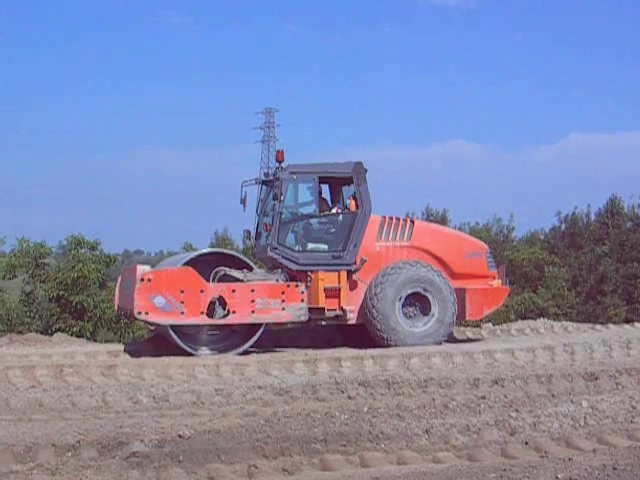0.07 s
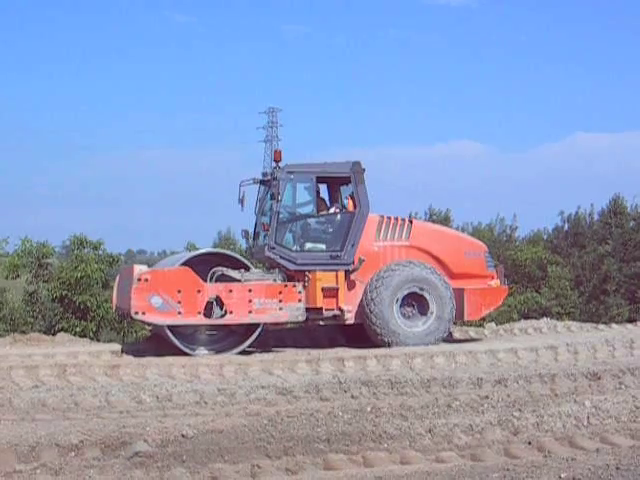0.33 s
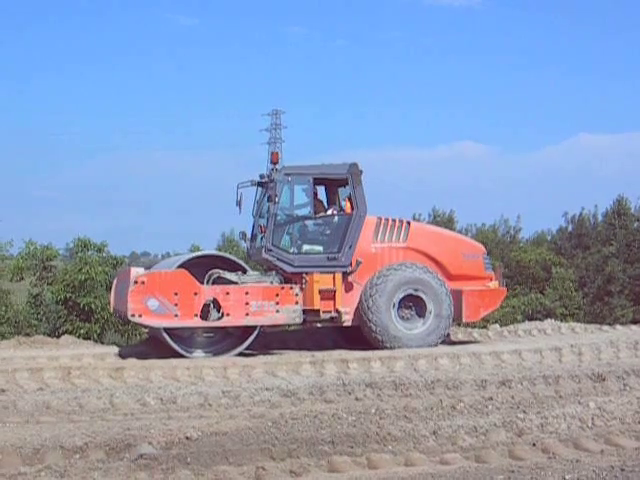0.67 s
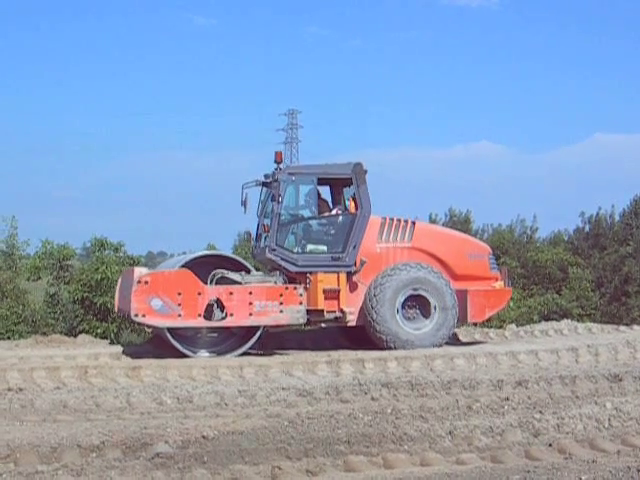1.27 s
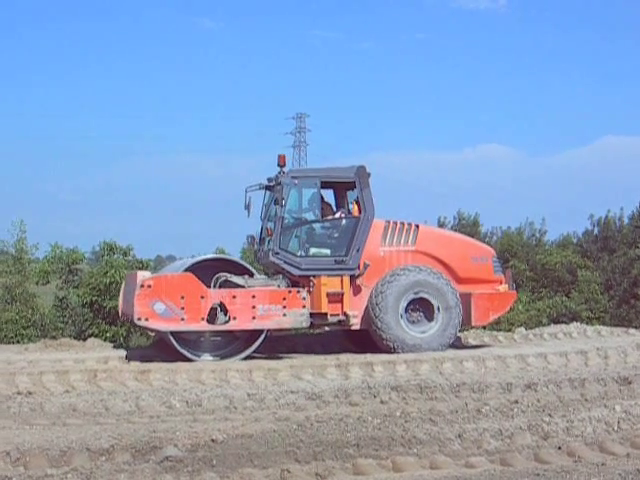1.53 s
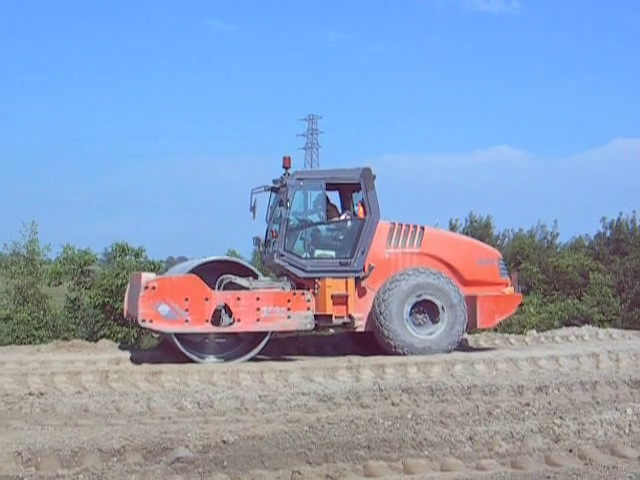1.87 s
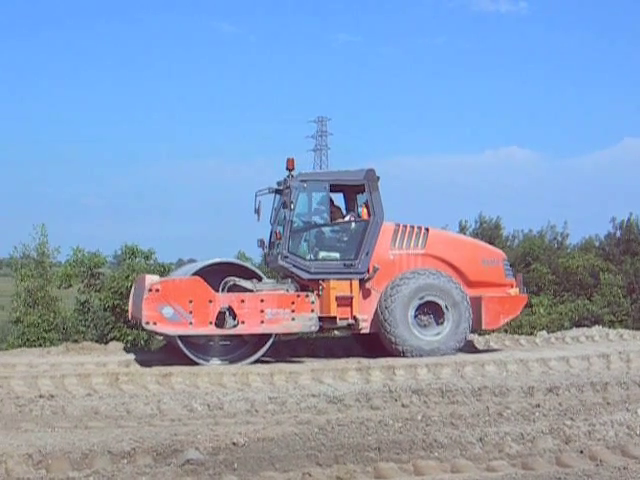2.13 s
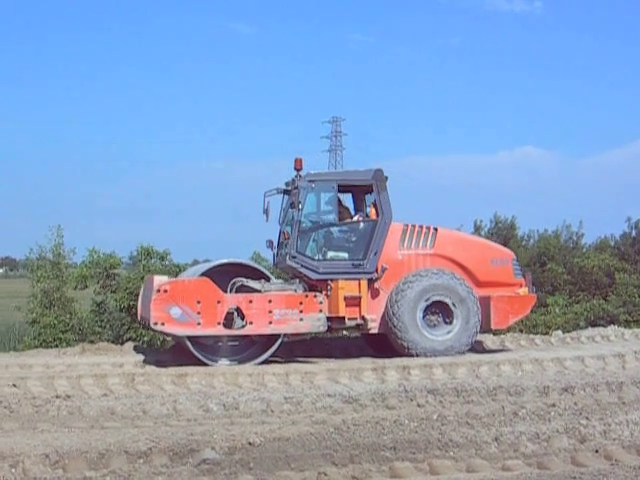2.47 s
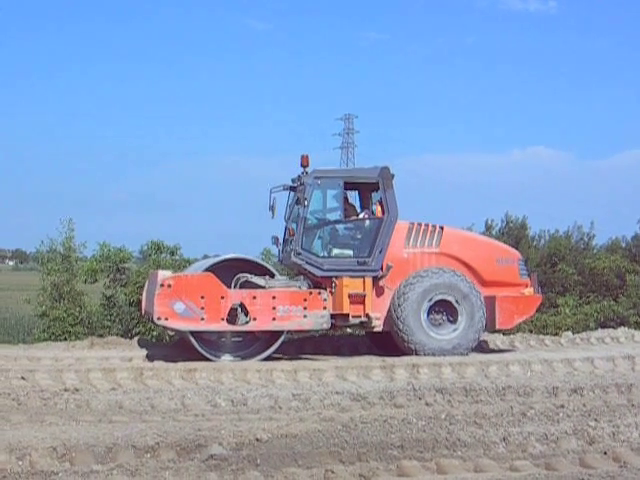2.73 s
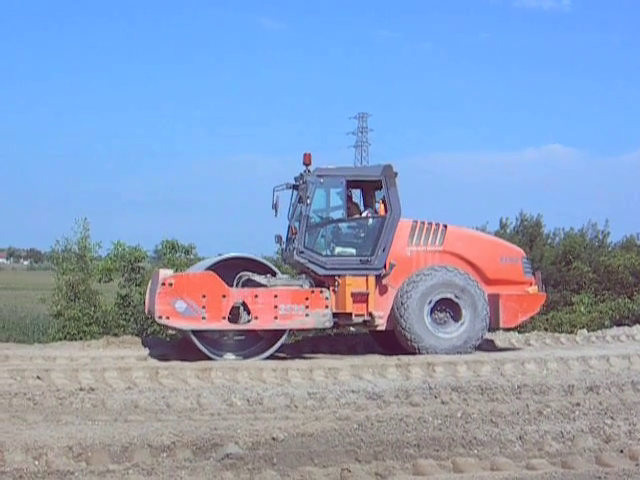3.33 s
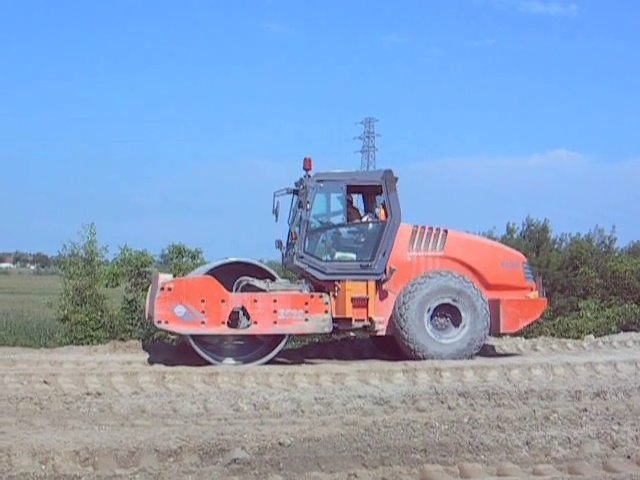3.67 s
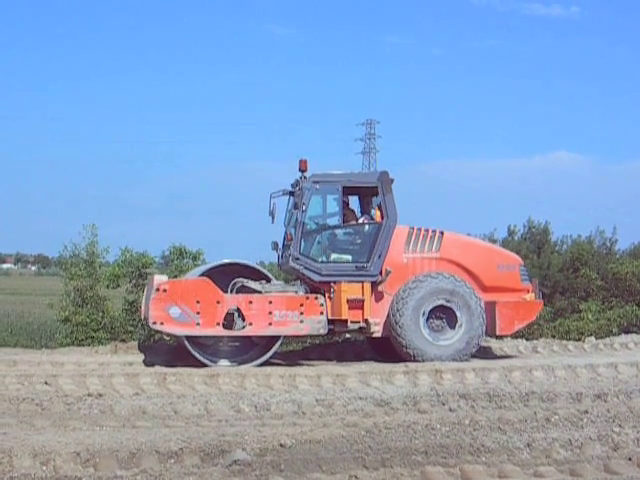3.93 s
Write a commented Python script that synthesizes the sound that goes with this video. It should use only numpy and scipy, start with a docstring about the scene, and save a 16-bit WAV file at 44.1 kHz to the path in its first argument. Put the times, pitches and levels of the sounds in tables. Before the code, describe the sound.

Steady low diesel drone of a heavy road roller, its frame vibrating and faintly clanking.

```python
"""A low diesel drone, with a booming frame over it: a heavy soil roller creeps over bare, open ground.
The governed four-cylinder engine fires twice per turn, sounding exhaust harmonics and knocking its
block, and drives a humming hydraulic pump. The vibrating drum forces the frame into oscillation:
panels boom and fittings rattle twice per turn. A loose plate clanks; once the frame briefly groans."""
import sys
import numpy as np
from scipy import signal
from scipy.fft import rfft, irfft
from scipy.io import wavfile
from scipy.ndimage import uniform_filter1d, minimum_filter1d

SR = 44100
rng = np.random.default_rng(int(sys.argv[2]) if len(sys.argv) > 2 else 0)


def persist_wave(psi):
    """Save psi, clipped to +-1, as 16-bit WAV."""
    counts = np.round(np.clip(psi, -1, 1) * 32767).astype(np.int16)
    wavfile.write(sys.argv[1], SR, np.atleast_2d(counts).T)


N = 176400
T = np.arange(N) / SR
CRANK_HZ, DRUM_HZ, PUMP_HZ = 47.72, 27.31, 453.6
WAVER, HUM_WAVER = .51, .08   # depth of random modulation: unsteady tones, steadier hums


def from_db(db):
    """Amplitude ratio: tenfold for every 20 dB."""
    return 10 ** (np.asarray(db) / 20)


def rms_one(x):
    """Normalisation to unit rms."""
    return x / np.sqrt(np.mean(x ** 2) + 1e-20)


def level(rows):
    """Amplitude envelope, interpolated between (t/s, level/dB) rows."""
    return from_db(np.interp(T, *np.transpose(rows)))


def drift(rate_hz):
    """Low-passed noise: a slow random fluctuation of spread 1."""
    pole = np.exp(-80 * np.pi * rate_hz / SR)   # one step per 40 samples
    noise = rng.standard_normal(N // 40 + 2002)
    slow = signal.lfilter([1], [1, -2 * pole, pole * pole], noise)[2000:]
    return np.interp(np.arange(N) / 40, np.arange(len(slow)), rms_one(slow))


def colour(x, spectrum):
    """Spectral shaping by (f/Hz, level/dB) rows; unit rms."""
    hz, db = np.transpose(spectrum)
    bins = np.maximum(np.arange(N // 2 + 1) * SR / N, 1)
    response = from_db(np.interp(np.log(bins), np.log(hz), db))
    return rms_one(irfft(rfft(x) * response, N))


def band(x, edges, kind="band", order=2):
    """Maximally flat filtering; unit rms."""
    return rms_one(signal.sosfilt(signal.butter(order, edges, kind, fs=SR, output="sos"), x))


def shaft(hz, wander=.0009):
    """Phase in turns: the integral of a governed, slightly wandering speed."""
    return np.cumsum(hz * (1 + wander * drift(1.5))) / SR


def tone(turns, waver, rate_hz=2.2):
    """A sinusoid under random amplitude and phase modulation; unit rms."""
    phasor = (1 + waver * (drift(rate_hz) + 1j * drift(rate_hz))) * np.exp(2j * np.pi * rng.random())
    return rms_one(np.real(phasor * np.exp(2j * np.pi * turns)))


def harmonics(turns, hz, rows, full_waver_hz=347):
    """Periodic motion sounds at multiples of its rate; the low ones are the steadiest."""
    return sum(from_db(db) * tone(round(k) * turns, WAVER * min(k * hz / full_waver_hz, 1))
               for k, db in rows)


def blows(turns, spread):
    """An impulse train: one blow per turn, of random strength."""
    new_turn = np.diff(np.floor(turns), prepend=np.floor(turns[0])) > 0
    return new_turn * (1 + spread * rng.uniform(-1.5, 1, N))


def roar():
    """Exhaust and soil radiate low-frequency noise with a continuous spectrum."""
    # spectrum of the roar: f/Hz, relative level/dB
    spectrum = [(20, -31), (42, -28), (55, -17.5), (70, -12.5), (86, -1), (112, 2), (150, -1), (172, -6.5),
                (200, 2), (228, 3), (265, -8), (305, -0.5), (340, 3), (385, -9), (450, -4.5), (700, -57)]
    return from_db(-23.5) * colour(rng.standard_normal(N), spectrum)


def panels(drum, modes, swell_db=.5, shake_depth=.21, top_hz=1860):
    """Noise-driven resonances of sheet metal, each swelling on its own, modulated at the drum's rate."""
    out = 0
    for hz, width_hz, db in modes:
        ringing = band(rng.standard_normal(N), [hz - width_hz / 2, hz + width_hz / 2], order=1)
        out = out + from_db(db) * rms_one(ringing * from_db(swell_db * drift(2.5)))
    out = signal.sosfilt(signal.butter(3, top_hz, fs=SR, output="sos"), out)
    return out * (1 + shake_depth * np.cos(2 * np.pi * drum))


def bodywork(drum):
    """Resonance: the shaken hood growls in its low modes, the frame's panels roar in higher ones."""
    # modes of hood and panels: f/Hz, bandwidth/Hz, relative level/dB
    hood_modes = [(464, 73, -6), (555, 42, -9), (635, 26, -9)]
    panel_modes = [(745, 43, -12), (852, 70, -12), (971, 48, -13.5), (1081, 89, -16.5)]
    # their envelopes: t/s, level/dB
    hood_level = [(0, -8.5), (.12, -17), (.23, -14.5), (.33, -17), (.55, -14.5), (.9, -15), (1.1, -19),
                  (1.35, -20.5), (1.58, -16.5), (1.8, -15.5), (2.05, -21), (2.17, -17), (2.33, -15),
                  (2.45, -20), (2.8, -15.5), (3.05, -16.5), (3.27, -12), (3.42, -20), (3.55, -14.5),
                  (4, -18.5)]
    panel_level = [(0, -17), (.25, -18.5), (.4, -18.5), (.5, -17), (.62, -20), (.72, -15.5), (1.05, -16.5),
                   (1.15, -21.5), (1.4, -19), (1.6, -20), (1.78, -16.5), (2.0, -17), (2.3, -16), (2.5, -17),
                   (2.8, -17.5), (3.0, -15.5), (3.3, -17.5), (3.43, -22.5), (3.55, -12.5), (3.7, -17.5),
                   (4, -13.5)]
    return level(hood_level) * panels(drum, hood_modes) + level(panel_level) * panels(drum, panel_modes)


def hydraulic_drive():
    """Pressure pulsation makes the pump hum; the drive whines, out of step with crank and drum."""
    # envelope of the hum: t/s, relative level/dB
    hum_level = [(0, -29), (.3, -30), (.48, -29), (.6, -26), (.88, -33.5), (1.05, -30), (1.18, -25),
                 (1.35, -23.5), (1.47, -36), (1.65, -28.5), (1.88, -25.5), (2.1, -39), (2.3, -29.5),
                 (2.6, -25), (2.75, -33.5), (3.05, -25.5), (3.25, -29), (3.42, -37.5), (3.6, -28), (4, -31)]
    # whines of the drive: f/Hz, level/dB
    whines = [(533.7, -30), (664.5, -33), (923, -37.5)]
    hum = from_db(3) * level(hum_level) * tone(shaft(PUMP_HZ), HUM_WAVER)
    return hum + sum(from_db(db) * tone(shaft(hz), WAVER) for hz, db in whines)


def groan(start_s=2.44, length_s=.27, hz=311, sag_hz_per_s=36):
    """The frame groans once: a linear downward glide in frequency."""
    age = np.clip(T - start_s, 0, length_s)
    turns = hz * age - sag_hz_per_s * age ** 2 / 2
    arch = np.sqrt(np.abs(np.sin(np.pi * age / length_s)))
    return from_db(-17.5) * arch * np.sin(2 * np.pi * turns)


def contact(age, hz=700, decay_s=.00091, tick_s=.0004):
    """An impact transient: a heavily damped knock with a sharp tick on its front."""
    thud = np.exp(-age / decay_s) * np.sin(2 * np.pi * hz * age)
    tick = from_db(-12.5) * np.exp(-age / tick_s) * rng.standard_normal(len(age))
    return thud + tick


def loose_plate():
    """Free vibration: a steel plate strikes the frame and its modes decay exponentially."""
    # impacts: t/s, relative ring level/dB, knock level/dB
    impacts = [(.464, -10.5, -9), (.936, -16, -9), (1.04, -17, -8), (1.413, -9, 1.5), (1.76, -12, -18),
               (1.886, -13, -18), (1.93, -12, -10), (2.003, -16, -18), (2.21, -11.5, -18),
               (2.728, -10, -7.5), (3.154, -8, -7), (3.384, -7.5, -12), (3.544, -7, -16), (3.793, -11, -10)]
    # modes of the plate: f/Hz, relative level/dB, time to fall 60 dB/s
    modes = [(800, -2.5, 0.054), (931, -3, 0.11), (999.5, 1, 0.15), (1150, -11, 0.11), (1514, -21, .04)]
    out = np.zeros(N)
    for start_s, ring_db, knock_db in impacts:
        clank = out[int(start_s * SR):][:SR // 4]
        age = T[:len(clank)]
        clank += from_db(knock_db) * contact(age)
        for hz, mode_db, t60 in modes:
            onset_db = ring_db + mode_db - 7 + rng.normal(0, 1.2)
            envelope = from_db(onset_db - 60 * age / t60)
            clank += envelope * np.sin(2 * np.pi * hz * age) * rng.choice([-1, 1])
    return out


def rattle(drum, scatter_turns=.064, spread=.6, decay_s=.0056):
    """Impact noise: loose fittings chatter on the drum's downstroke and more softly on its backstroke."""
    loose = drum + scatter_turns * drift(15)
    hits = blows(loose, spread) + from_db(-3.5) * blows(loose + .5, spread)
    envelope = signal.lfilter([1], [1, -np.exp(-1 / (decay_s * SR))], hits + 1e-18)
    return rms_one(envelope * rng.standard_normal(N))


def knock(crank, cylinders=4, decay_s=.02):
    """Each cylinder fires every second turn and excites its own impulse response of the block."""
    rings = rng.standard_normal((cylinders, SR // 10)) * np.exp(-T[:SR // 10] / decay_s)
    return rms_one(sum(signal.fftconvolve(blows(crank / 2 + k / cylinders, spread=.23), ring)[:N]
                       for k, ring in enumerate(rings)))


def clatter(crank, drum, low_cut_hz=1200):
    """Source and filter: fan rush, knock and rattle are coloured by the block and its fittings."""
    # response of block and fittings: f/Hz, relative level/dB
    response = [(700, -0.5), (1150, 3.5), (1240, -1.5), (1330, 1), (1550, -1.5), (1800, -4), (2100, -2.5),
                (2550, -5), (2950, -6.5), (3430, -11), (3700, -15), (3920, -22), (4220, -23), (4500, -28),
                (4750, -38), (5000, -39.5)]
    # envelope of the clatter: t/s, relative level/dB
    clatter_level = [(.25, -22), (.5, -23.5), (.7, -24), (1.0, -22), (1.25, -24), (1.42, -23.5),
                     (1.55, -24.5), (1.7, -23), (2.2, -23), (2.45, -24), (2.9, -23.5), (3.15, -22.2),
                     (3.4, -23.5), (3.53, -22), (3.65, -23), (4, -22.5)]
    fan = rng.standard_normal(N)
    excitation = fan + from_db(-2.5) * knock(crank) + from_db(-5) * rattle(drum)
    return from_db(2.24) * level(clatter_level) * band(colour(excitation, response), low_cut_hz, "high")


def frame(drum):
    """Forced vibration: the frame sounds harmonics of the drum's rate; one panel booms at the eighth."""
    # tones of the frame: multiple of the drum rate, level/dB
    partials = [(1, -46.5), (2, -57), (4, -45), (5, -29.5), (6, -38.5), (7, -41.5), (9, -37), (15, -46),
                (16, -39), (17, -36.5), (18, -32), (19, -36), (20, -35.5), (22, -32), (23, -32.5),
                (24, -41), (25, -36), (27, -37), (28, -43.5), (29, -39.5), (30, -36.5), (35, -44),
                (36, -37)]
    # envelope of the booming panel: t/s, relative level/dB
    boom_level = [(0, -29.5), (.2, -31), (.3, -32.5), (.55, -27), (.72, -25.5), (.8, -34.5), (1.05, -26),
                  (1.38, -25), (1.5, -38.5), (1.63, -20), (1.8, -27), (2.0, -25.5), (2.13, -24.5),
                  (2.34, -21.5), (2.46, -25), (2.62, -23.5), (2.88, -19.5), (3.03, -34), (3.3, -29),
                  (3.47, -20.5), (3.56, -19), (3.67, -30), (3.78, -19.5), (3.85, -19.5), (3.95, -26.5)]
    tones = harmonics(drum, DRUM_HZ, partials)
    boom = from_db(-.6) * level(boom_level) * tone(8 * drum, waver=.06)
    return tones + boom


def exhaust(crank):
    """Periodic gas pulses sound harmonics of the crank rate, led by the firing tone at twice that rate."""
    # envelopes of the firing tone, the low throb and the silencer's ringing: t/s, relative level/dB
    firing_level = [(0, -13), (.3, -15), (1.3, -15.5), (2.3, -15.5), (2.45, -16), (3.2, -16), (3.5, -17),
                    (4, -15)]
    throb_level = [(0, -27.5), (.6, -31.5), (1.25, -33.5), (1.47, -22.5), (1.65, -31), (1.88, -31),
                   (2.0, -28), (2.2, -29.5), (2.45, -49.5), (2.85, -39), (3.05, -28), (3.45, -31),
                   (3.6, -37), (3.82, -25), (4, -35)]
    silencer_level = [(0, -38), (.22, -23), (.4, -30), (.72, -25.5), (.95, -29.5), (1.15, -23), (1.42, -27),
                      (1.55, -29.5), (1.68, -31.5), (1.98, -29), (2.2, -25), (2.35, -26), (2.52, -32),
                      (2.75, -31), (2.98, -25), (3.22, -27.5), (3.35, -34), (3.55, -22), (3.92, -25.5),
                      (4, -15.5)]
    # other exhaust tones: multiple of the crank rate, relative level/dB
    partials = [(1, -51), (3, -34), (4, -34), (6, -35.5), (8, -38), (10, -36.5), (14, -41), (16, -38.5),
                (18, -34.5), (24, -40), (36, -53.5), (48, -51), (66, -50)]
    firing = from_db(.5) * level(firing_level) * tone(2 * crank, waver=.04)
    throb = level(throb_level) * tone(5 * crank, HUM_WAVER)
    silencer = from_db(3.5) * level(silencer_level) * tone(12 * crank, HUM_WAVER)
    return firing + throb + silencer + from_db(.5) * harmonics(crank, CRANK_HZ, partials)


def scene():
    """Superposition of all sources in one channel; engine and drum each turn on their own shaft."""
    crank, drum = shaft(CRANK_HZ), shaft(DRUM_HZ)
    background = roar() + bodywork(drum) + hydraulic_drive()
    metal = groan() + loose_plate() + clatter(crank, drum)
    return (background + metal + frame(drum) + exhaust(crank))[None]


def record(dry, ceiling=.96, window_s=.006, start_s=.035, cutoff_hz=4807):
    """Peak limiting and band limiting: after a moment's silence, sound passes with its treble cut."""
    window = int(window_s * SR) | 1
    headroom = ceiling / np.maximum(np.abs(dry), ceiling)
    gain = uniform_filter1d(minimum_filter1d(headroom, window), window)
    limited = dry * gain * (T >= start_s)
    return signal.sosfilt(signal.ellip(10, .1, 90, cutoff_hz, fs=SR, output="sos"), limited)


dry = scene()
out = record(dry)
persist_wave(out)
```